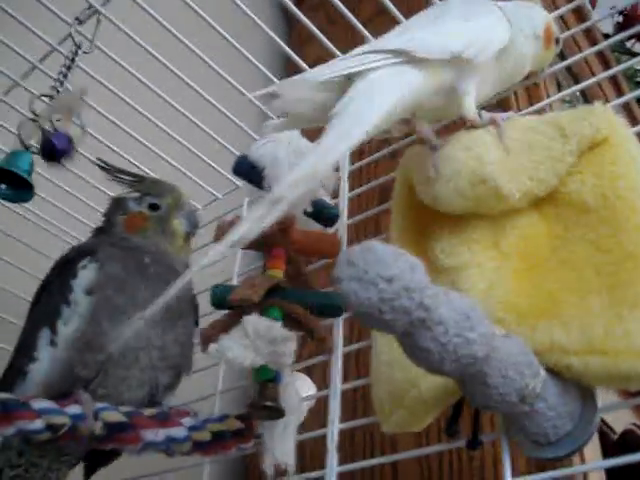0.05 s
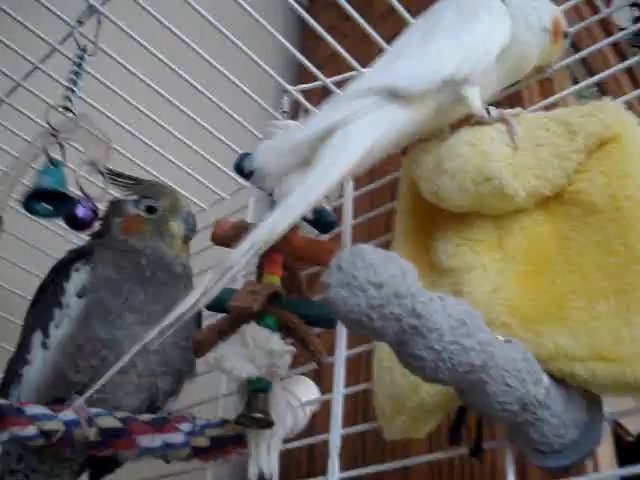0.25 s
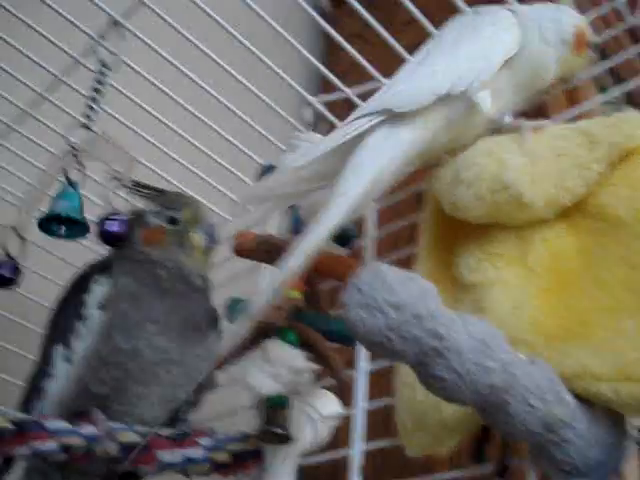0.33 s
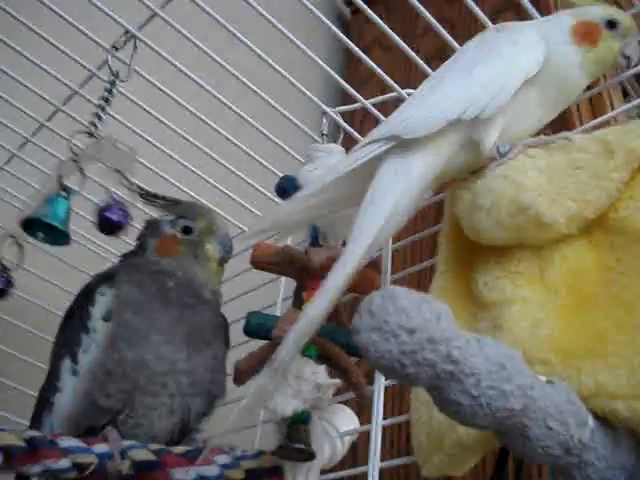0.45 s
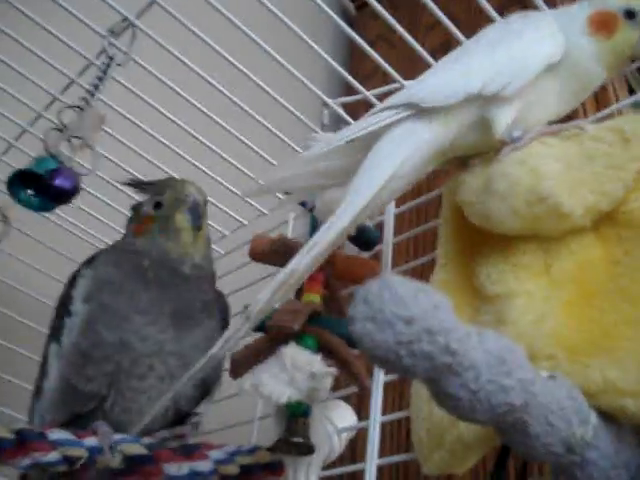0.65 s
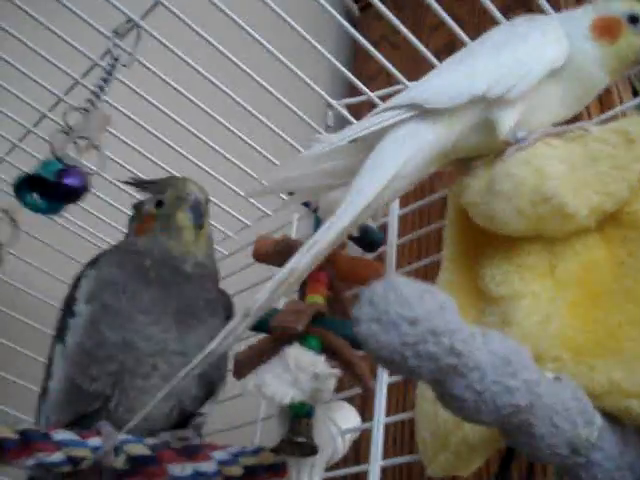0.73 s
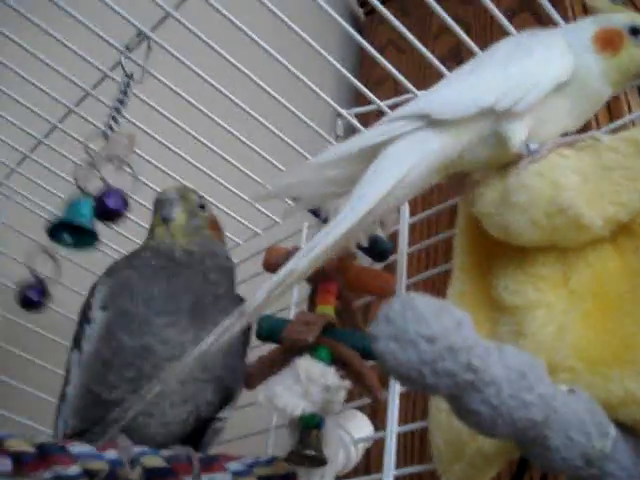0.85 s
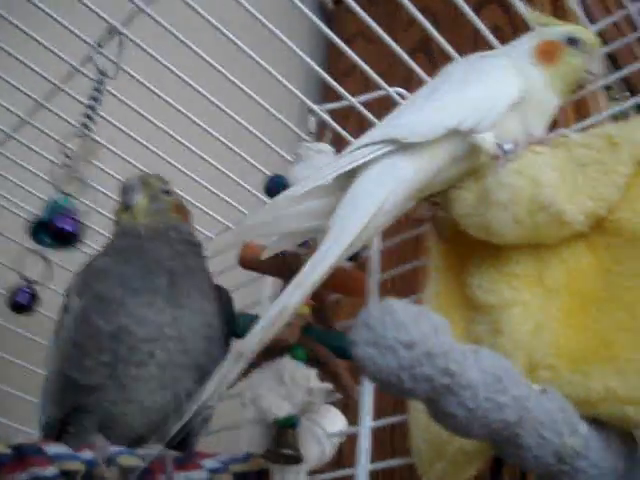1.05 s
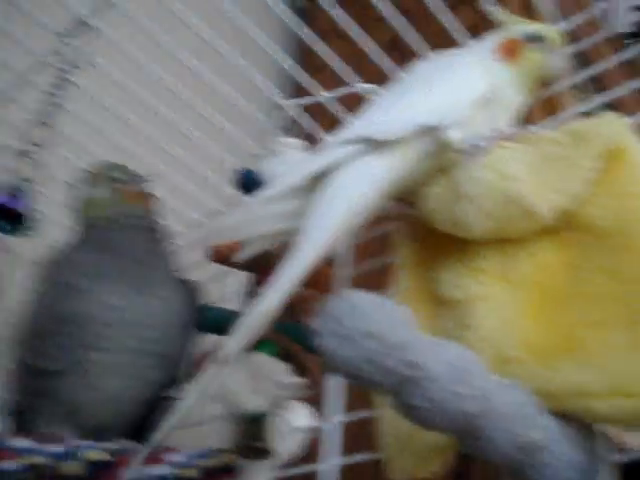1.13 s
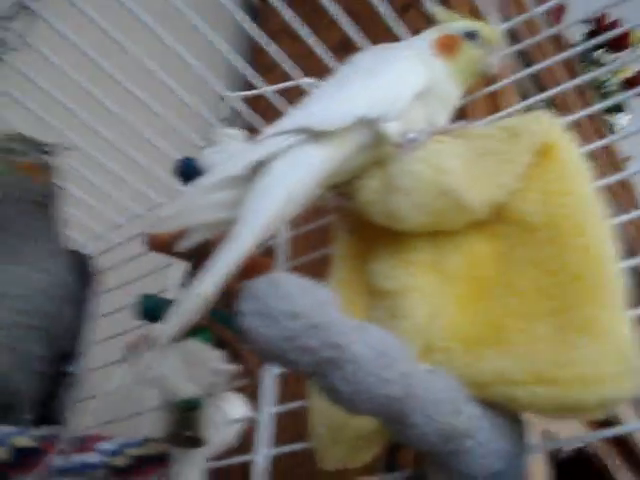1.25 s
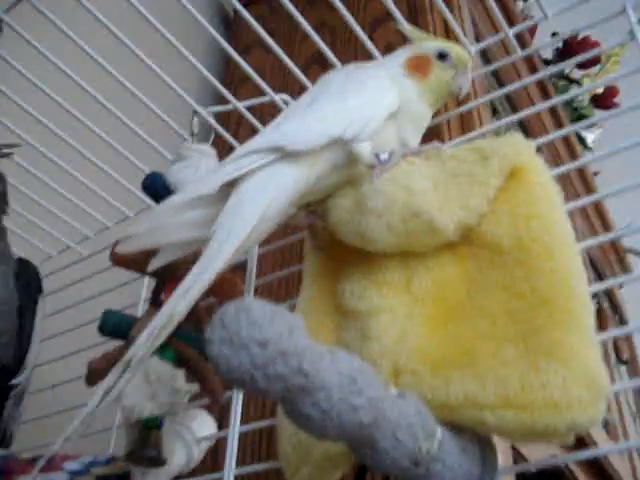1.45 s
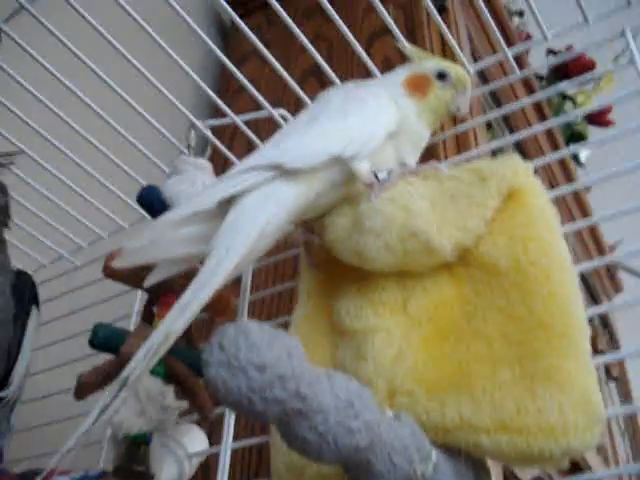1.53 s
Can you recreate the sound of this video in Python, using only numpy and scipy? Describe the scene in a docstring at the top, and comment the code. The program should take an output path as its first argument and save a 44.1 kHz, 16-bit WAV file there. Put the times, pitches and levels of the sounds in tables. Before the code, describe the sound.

A cockatiel squawks once in a small, quietly humming room. Soft whistles lead into a hoarse yelp at 0.2 seconds, then the harsh, high squawk lasts from 0.3 to 0.55 seconds, leaving a faint ring. As it starts, feathers rustle and wing beats puff against the microphone. Weak warbling notes fade until about 1 second, with another slight rustle, and a dry, close tick comes near 1.2 seconds.

```python
"""Soft whistled notes over a quiet room hum: a caged cockatiel leads in, yelps, squawks once, warbles down.
In the squawk its syrinx flutters on two separate pitches over a rasp that rings the throat.
Feathers rustle and wing beats puff air at the microphone; near the end something ticks once.
The room is small and lively, and a faint ring lingers after the squawk."""
import sys
import numpy as np
from scipy import signal
from scipy.fft import rfft, irfft
from scipy.io import wavfile

SR = 44100
rng = np.random.default_rng(int(sys.argv[2]) if len(sys.argv) > 2 else 0)


def dump_mix(stems):
    """Bounce the given channels to the path in sys.argv[1] as a 16-bit WAV at rate SR."""
    frames = np.atleast_2d(stems).T  # one column per channel
    limited = np.clip(frames, -1, 1)  # hard clip at full scale
    pcm = np.round(limited * 32767).astype(np.int16)
    wavfile.write(sys.argv[1], SR, pcm)


N = 70560


def undb(db):
    """Decibels to gain."""
    return 10 ** (np.asarray(db) / 20)


def unit(x):
    """Scale to rms 1."""
    return x / np.sqrt(np.mean(x ** 2))


def clock():
    """Time of every sample."""
    return np.arange(N) / SR


def curve(table, column):
    """One column of a table as an automation lane, joined by straight lines."""
    rows = np.array(table, float)
    return np.interp(clock(), rows[:, 0], rows[:, column])


def gate(start, length, attack, release):
    """Envelope: linear rise, hold, exponential release (all in s)."""
    t = clock() - start
    return np.clip(t / attack, 0, 1) * np.exp(-np.maximum(t - length, 0) / release)


def fader(table, column):
    """Gain riding a level column, opening at the first row and dying away after the last."""
    start, end = table[0][0], table[-1][0]
    return undb(curve(table, column)) * gate(start, end - start, attack=.0029, release=.0045)


def eq(x, points):
    """Minimum-phase EQ through (f/Hz, level/dB) points."""
    hz, db = np.array(points, float).T
    size = 2 * N
    f = np.maximum(np.arange(N + 1) * SR / size, 1)
    gain = undb(np.interp(np.log(f), np.log(hz), db))
    cepstrum = irfft(np.log(gain))
    cepstrum[1:N] *= 2  # folded onto positive time: no pre-ring
    cepstrum[N + 1:] = 0
    return irfft(rfft(x, size) * np.exp(rfft(cepstrum)))[:N]


def noise(points):
    """Coloured noise of rms 1."""
    return unit(eq(rng.standard_normal(N), points))


def wobble(hz):
    """Random modulator of rms 1, rolled off above the given rate."""
    return unit(signal.sosfilt(signal.butter(2, hz, fs=SR, output="sos"), rng.standard_normal(N)))


def bursts(table, points, attack, release):
    """Short swells of coloured noise, one per row."""
    envelope = sum(undb(db) * gate(start, length, attack, release) for start, length, db in table)
    return noise(points) * envelope


# Room tone spectrum: f/Hz, level/dB
HUM_EQ = [(15, -37.5), (25, -7), (54, -11.5), (168, -4), (314, 0), (384, -1), (634, -4.5), (795, -7),
          (1100, -10.5), (1770, -12), (1910, -13), (2930, -16.5), (4370, -18.5), (10000, -27.5),
          (13000, -80), (22000, -120)]
def room_hum():
    """A quiet, steady noise bed, fullest in the low mids."""
    return undb(-50) * noise(HUM_EQ)


LOW_T60_S, TREBLE_T60_S, CROSSOVER_HZ, PREDELAY_S = .48, .38, 2700, .004
def room(x):
    """Direct sound, early reflections off close walls and a tail whose treble dies sooner."""
    t = clock()
    wash = rng.standard_normal(N)
    low = signal.sosfiltfilt(signal.butter(2, CROSSOVER_HZ, fs=SR, output="sos"), wash)
    tail = low * undb(-60 * t / LOW_T60_S) + (wash - low) * undb(-60 * t / TREBLE_T60_S)
    early = rng.standard_normal(N) * gate(PREDELAY_S, 0, attack=.00075, release=.02)
    response = (undb(-4.5) * unit(tail * (t > PREDELAY_S)) + undb(-7) * unit(early)) / np.sqrt(N)
    return x + signal.fftconvolve(x, response)[:N]


# Resonances of the tick: f/Hz, level/dB
TICK_EQ = [(300, -20), (550, -14), (850, -4), (1200, 0), (1700, 0.5), (2200, -6), (2800, 3), (3800, -12),
           (6000, -14.5), (8500, -13.5), (10000, -31)]
def tick():
    """A dry click close to the microphone."""
    decay_s = .0021
    crack = rng.standard_normal(N) * gate(start=1.2394, length=0, attack=.0001, release=decay_s)
    return undb(-33) * unit(eq(crack, TICK_EQ)) * np.sqrt(decay_s * SR / N)


# Wing beats: t/s, length/s, level/dB
PUFF_CUES = [(.319, .016, -37), (.342, 0.015, -46), (.407, 0.01, -42.5)]
# Their bass-heavy spectrum: f/Hz, level/dB
PUFF_EQ = [(15, -0.5), (45, 5.5), (90, -19.5), (200, -11), (500, -47)]
def wing_puffs():
    """Air pushed by the wings hits the microphone in soft thumps."""
    return bursts(PUFF_CUES, PUFF_EQ, attack=.003, release=.006)


# Feather movements: t/s, length/s, level/dB
RUSTLE_CUES = [(.288, 0.014, -35.5), (.92, 0.055, -50.5)]
# Their bright spectrum: f/Hz, level/dB
RUSTLE_EQ = [(1000, -6.5), (3000, 5), (5500, -1), (8000, 3), (10000, -12)]
def feather_rustle():
    """Moving feathers give brief brushes of hiss."""
    return bursts(RUSTLE_CUES, RUSTLE_EQ, attack=.01, release=.021)


FLUTTER_HZ, FLUTTER_SWING, FLUTTER_DEPTH = 380, .075, .57  # swing and depth at full roughness
WAVER_HZ, WAVER_SWING_HZ, SHIMMER_DB = 70, 45, 2  # swing at full roughness
def syrinx(hz, rough, overtones_db, bright_db):
    """A whistling membrane that wavers in pitch and strength, and flutters as it gets rough."""
    fluttering_hz = hz * (1 + FLUTTER_SWING * rough * wobble(FLUTTER_HZ))
    drift_hz = WAVER_SWING_HZ * np.sqrt(np.abs(rough)) * wobble(WAVER_HZ)
    phase = 2 * np.pi * np.cumsum(fluttering_hz + drift_hz) / SR
    tremolo = np.abs(1 + FLUTTER_DEPTH * rough * wobble(FLUTTER_HZ))
    shimmer = undb(SHIMMER_DB * wobble(WAVER_HZ))
    overtones = sum(undb(db) * np.sin(k * phase) for k, db in enumerate(overtones_db, start=2))
    return np.sqrt(2) * tremolo * shimmer * (np.sin(phase) + undb(bright_db) * overtones)


def tone(table, overtones_db=()):
    """One tone with automated pitch, level and roughness; brightness scales any overtones."""
    hz, rough = curve(table, column=1), curve(table, column=3)
    bright_db = curve(table, column=4) if len(overtones_db) else 0
    return fader(table, column=2) * syrinx(hz, rough, overtones_db, bright_db)


# Whistles before and after the squawk: t/s, length/s, final f/Hz, level/dB, roughness/0-1
WARBLE_NOTES = [(0.077, 0.017, 3317, -50.5, 0.64), (.087, 0.03, 2875, -51, 0.46),
                (.122, 0.031, 2324, -50, .3), (.135, .025, 1739, -47, .5), (0.151, 0.016, 2894, -47, .4),
                (.163, 0.026, 1740, -33, .2), (.647, .05, 1309, -36.5, .3), (0.68, 0.023, 1785, -37, 0.97),
                (0.716, 0.042, 2302, -47, 0.29), (.734, .048, 1135, -44, .15),
                (.783, 0.021, 1819, -38.5, .6), (0.811, 0.029, 2265, -46, 0.38),
                (.829, .044, 1112, -41.5, .18), (.886, 0.04, 1711, -42, 0.72),
                (.911, 0.039, 2277, -45.5, 0.45), (.94, 0.031, 1109, -45, .18),
                (.985, 0.038, 2205, -54.5, .3)]
def warble():
    """Short soft notes, each starting a little sharp and dropping onto its pitch."""
    scoop, settle_s = .035, .012
    notes = 0
    for start, length, hz, db, rough in WARBLE_NOTES:
        pitch = hz * (1 + scoop * np.exp(-np.maximum(clock() - start, 0) / settle_s))
        envelope = undb(db) * gate(start, length, attack=.0026, release=.005)
        notes = notes + envelope * syrinx(pitch, rough, overtones_db=[-24], bright_db=0)
    return notes


# Body of the yelp: t/s, f/Hz, level/dB, roughness/0-1, brightness/dB
YELP_BODY = [(.192, 2800, -38, .9, -20.5), (.2, 2512, -22.5, 0.77, -25), (.212, 2260, -21, .5, -2.5),
             (.222, 2236, -30.5, 0.68, 8.5), (.233, 2230, -19.5, 0.28, 2), (.246, 2236, -21, 0.2, -10),
             (.252, 2230, -36, 0.18, -6), (.287, 2190, -43.5, .2, 1.5)]
# Its harmonics 2 to 4, before brightness: level/dB
YELP_HARMONICS = [-18.5, -28, -40]
# Hoarse second tone on top: t/s, f/Hz, level/dB, roughness/0-1, unused
YELP_TOP = [(.218, 3860, -54, 0.7, 0), (.226, 3910, -42, 0.5, 0), (.245, 3870, -39.5, .6, 0),
            (.26, 3880, -54.5, .6, 0)]
def yelp():
    """A hoarse cry that drops onto a clearer pitch."""
    return tone(YELP_BODY, YELP_HARMONICS) + tone(YELP_TOP)


# Fader ride of the rasp: t/s, level/dB
RASP_RIDE = [(.289, -39), (.298, -17.5), (.33, -29.5), (.39, -25.5), (.44, -26.5), (.48, -31.5),
             (.535, -31.5), (.57, -55)]
# Resonances of throat and beak: f/Hz, level/dB
THROAT_EQ = [(900, -52.5), (1250, -25), (1470, -23), (1620, -6.5), (2000, -2), (2600, 0), (3200, 0.5),
             (3700, -8), (4100, -16), (5000, -18), (5700, -23.5), (7000, -28), (8800, -35), (10500, -45)]
def rasp():
    """Pulses of uneven spacing and strength ring the throat."""
    rate_hz, jitter, scatter_db = 700, .35, 3.5
    cycles = np.cumsum(rate_hz * np.exp(jitter * wobble(rate_hz))) / SR
    pulses = np.diff(np.floor(cycles), prepend=0) * undb(scatter_db * rng.standard_normal(N))
    return fader(RASP_RIDE, column=1) * unit(eq(pulses, THROAT_EQ))


# The squawk's two main tones, the lower ending in a ring near 2650 Hz:
# t/s, f/Hz, level/dB, roughness/0-1, brightness/dB
UPPER_TONE = [(.286, 2980, -40.5, 0.63, -12), (.297, 3136, -16.5, .7, -9), (.307, 3295, -17, 0.9, -15),
              (.319, 3405, -19, 0.63, -22), (.329, 3447, -15.5, 0.46, 6), (.341, 3642, -14.5, 0.18, 3),
              (.348, 3559, -23, 0.3, 0.5), (.358, 3590, -24, 0.37, -1), (.384, 3474, -23.5, .5, -5),
              (.408, 3657, -13.5, 0.1, -4), (.415, 3627, -33.5, 0.44, 2.5), (.431, 3597, -18, 0.41, -11),
              (.452, 3580, -39, 0.36, -9), (.502, 3524, -25, 0.46, -14.5), (.54, 3480, -59, .7, -11)]
LOWER_TONE_AND_RING = [(.292, 2550, -27.5, .9, -1), (.345, 2531, -50, 0.88, 1), (.36, 2470, -21, .4, 1.5),
                       (.398, 2500, -31.5, 0.61, 2), (.419, 2549, -25.5, 0.33, 4),
                       (.432, 2543, -35, 0.59, 4), (.445, 2572, -14.5, 0.31, -8),
                       (.456, 2560, -29, 0.42, -6), (.472, 2597, -27.5, 0.13, -6),
                       (.487, 2498, -36, 0.48, -6), (.502, 2300, -28.5, 0.2, -7),
                       (.525, 2306, -27, 0.74, -14), (.538, 2634, -27, 0.28, -19.5),
                       (.57, 2675, -37, 0.65, -13)]
# Second harmonic of each, before brightness: level/dB
UPPER_HARMONIC = [-20.5]
LOWER_HARMONIC = [-16]
# Weak low tone in the squawk, lingering as a ring near 1950 Hz:
# t/s, f/Hz, level/dB, roughness/0-1, unused
WEAK_TONE_AND_RING = [(.294, 1640, -35.5, 0.12, 0), (.335, 1690, -29.5, 0.3, 0),
                      (.365, 1700, -40.5, 0.77, 0), (.405, 1900, -41.5, 0.31, 0),
                      (.435, 1970, -29.5, 0.5, 0), (.48, 1900, -51.5, 0.77, 0),
                      (.547, 1950, -28.5, 0.65, 0), (.58, 1920, -45.5, 0.65, 0),
                      (.67, 1930, -46.5, 0.33, 0)]
def squawk():
    """Two fluttering main tones, a weak low one and the rasp; the lower two end as the room's ring."""
    main_tones = tone(UPPER_TONE, UPPER_HARMONIC) + tone(LOWER_TONE_AND_RING, LOWER_HARMONIC)
    return main_tones + tone(WEAK_TONE_AND_RING) + rasp()


def scene():
    """Mono mix: bird and feathers through the room and trimmed; puffs, tick and hum dry."""
    bird = warble() + yelp() + squawk() + feather_rustle()
    puffs = wing_puffs()
    return (undb(-1.5) * room(bird) + puffs + tick() + room_hum())[None]


def record(dry):
    """Master chain: a soft clipper rounds the loudest peaks and a steep low-pass cuts the top."""
    ceiling, top_hz = undb(-3.5), 10000
    rounded = dry / (1 + (dry / ceiling) ** 4) ** .25
    return signal.sosfilt(signal.ellip(10, .2, 70, top_hz, fs=SR, output="sos"), rounded)


dry = scene()
out = record(dry)
dump_mix(out)
```